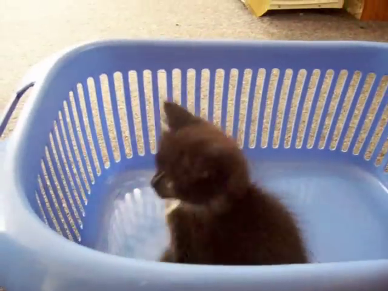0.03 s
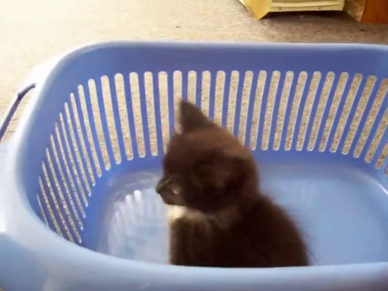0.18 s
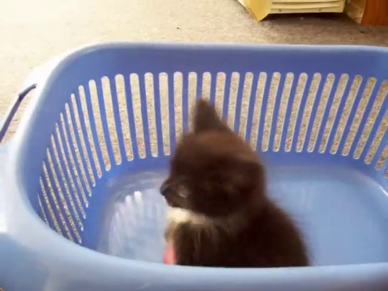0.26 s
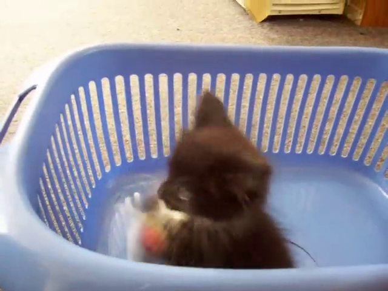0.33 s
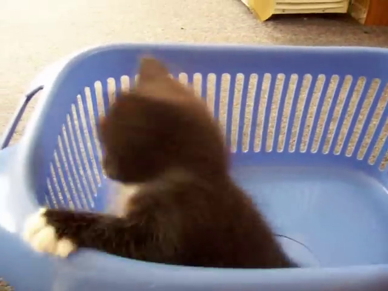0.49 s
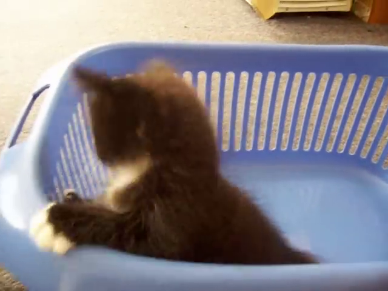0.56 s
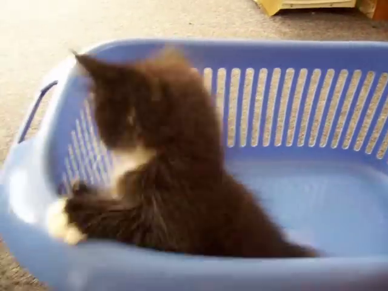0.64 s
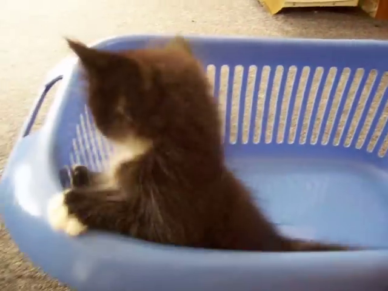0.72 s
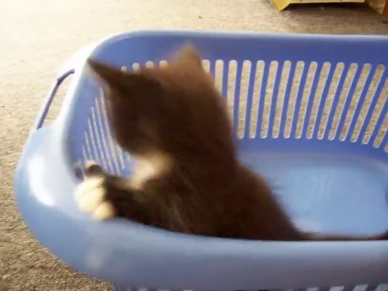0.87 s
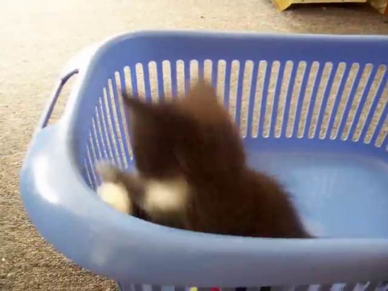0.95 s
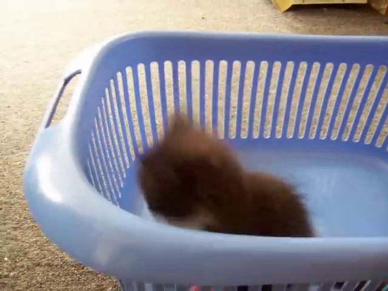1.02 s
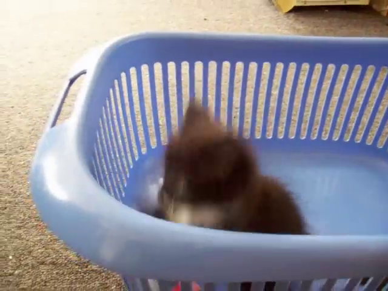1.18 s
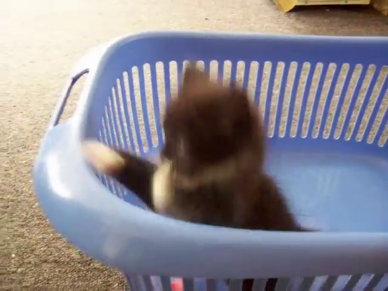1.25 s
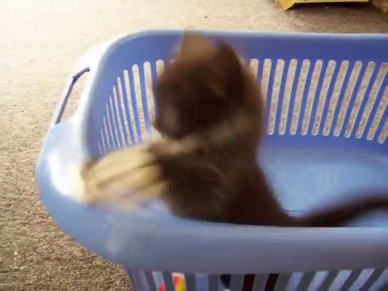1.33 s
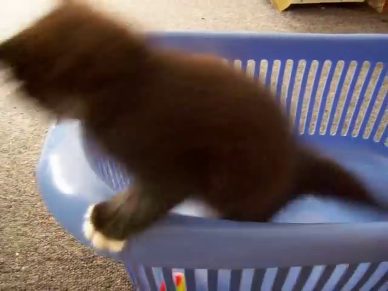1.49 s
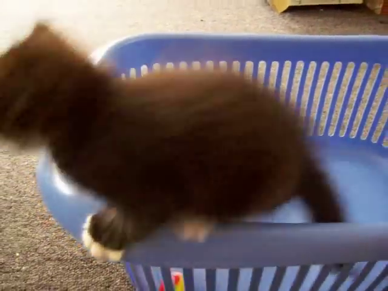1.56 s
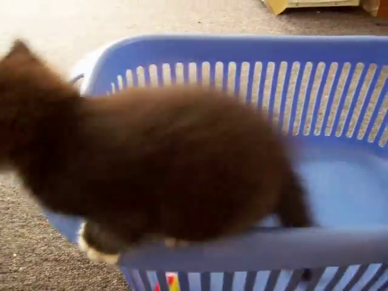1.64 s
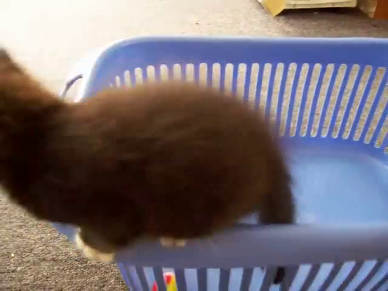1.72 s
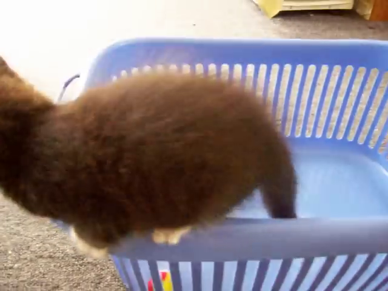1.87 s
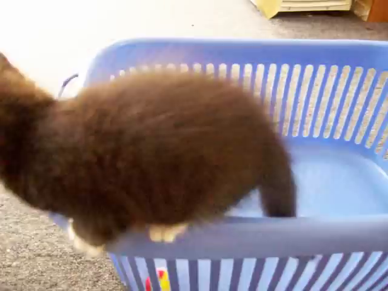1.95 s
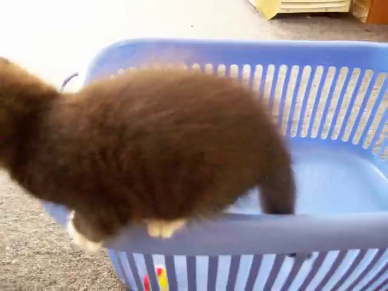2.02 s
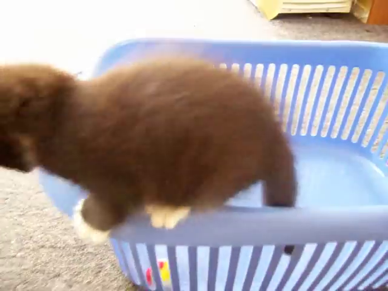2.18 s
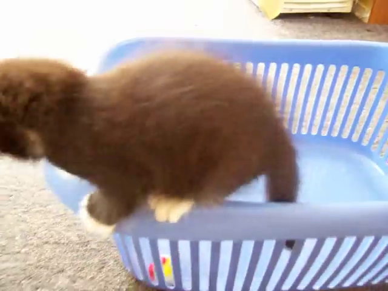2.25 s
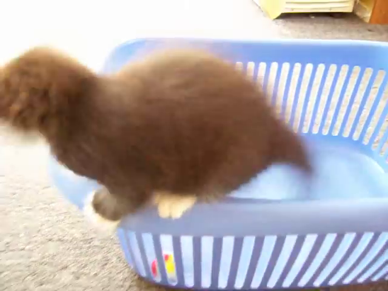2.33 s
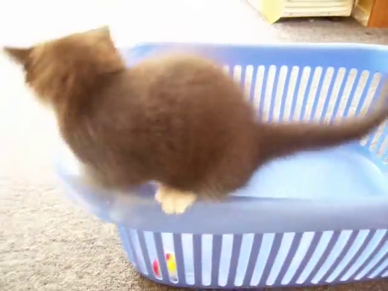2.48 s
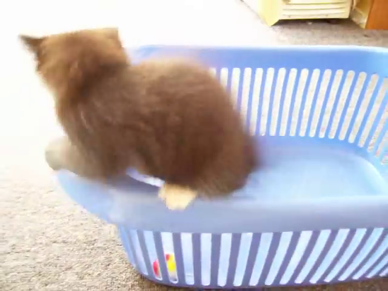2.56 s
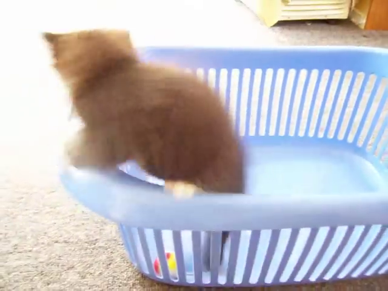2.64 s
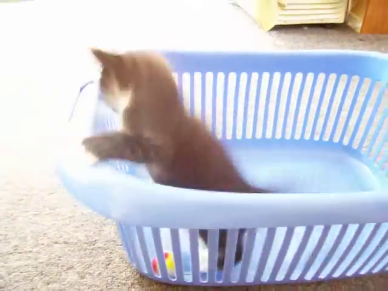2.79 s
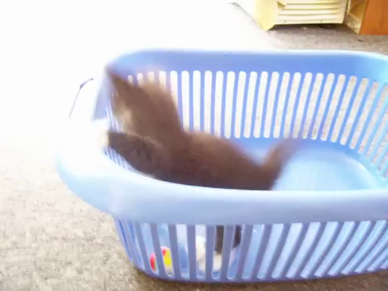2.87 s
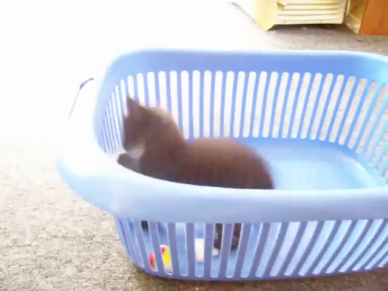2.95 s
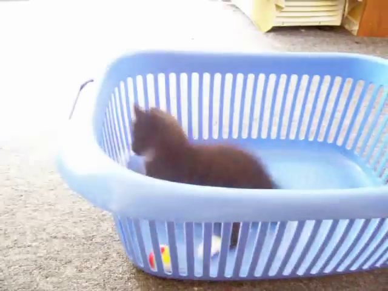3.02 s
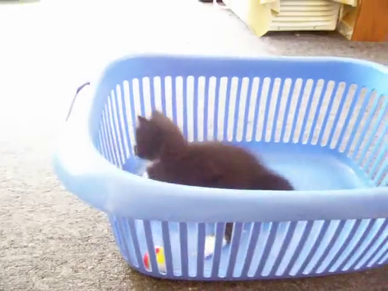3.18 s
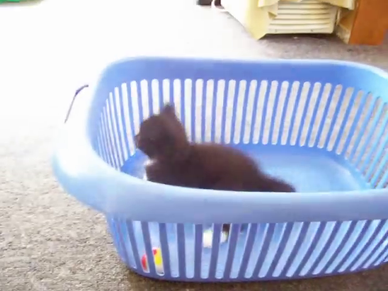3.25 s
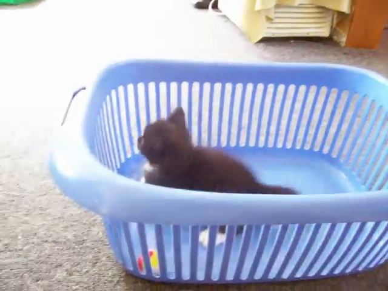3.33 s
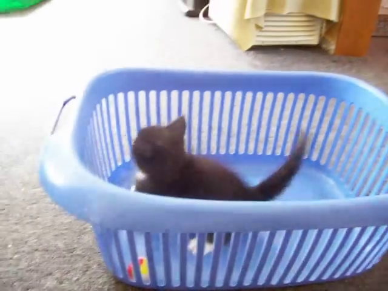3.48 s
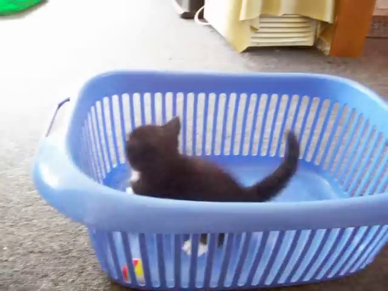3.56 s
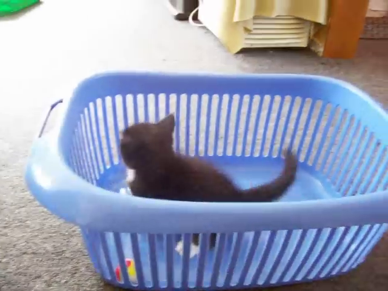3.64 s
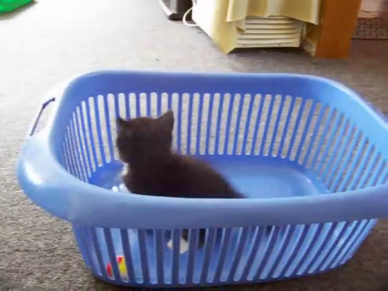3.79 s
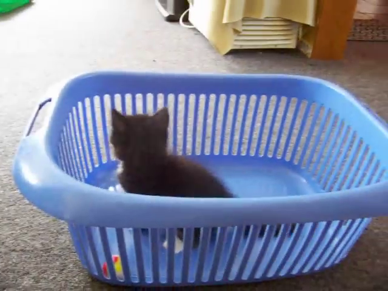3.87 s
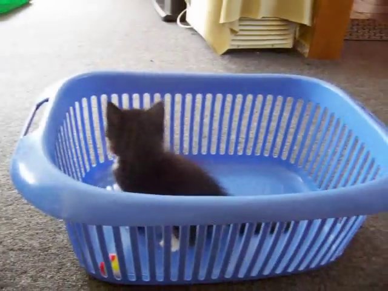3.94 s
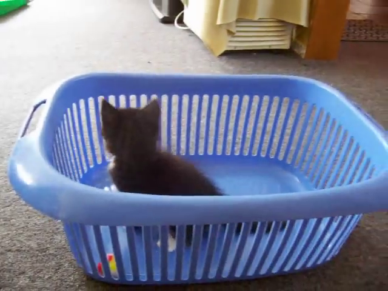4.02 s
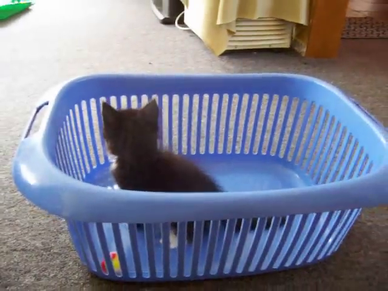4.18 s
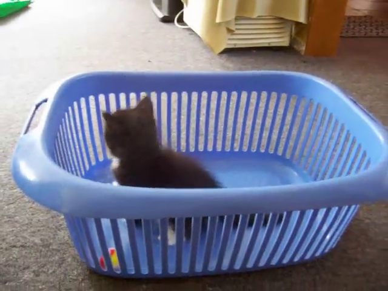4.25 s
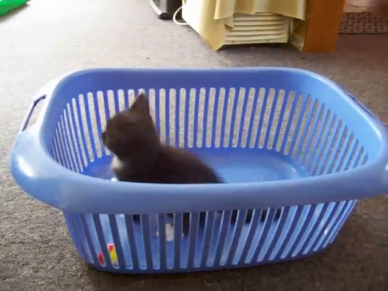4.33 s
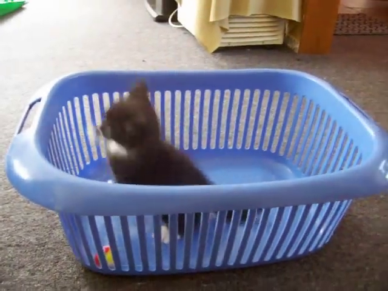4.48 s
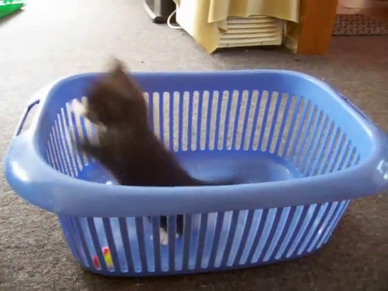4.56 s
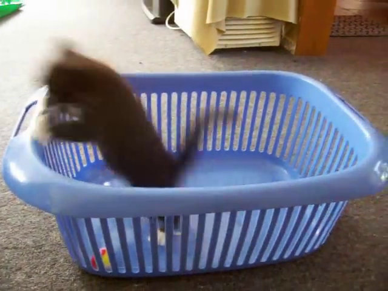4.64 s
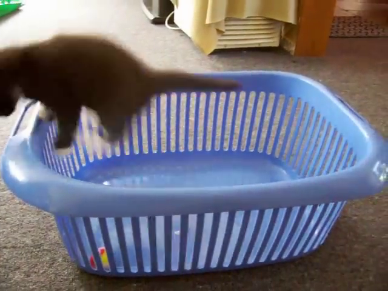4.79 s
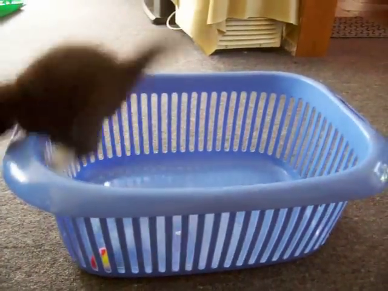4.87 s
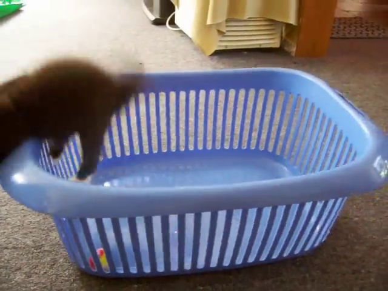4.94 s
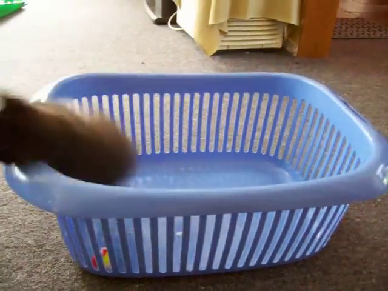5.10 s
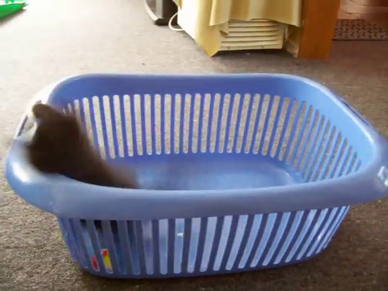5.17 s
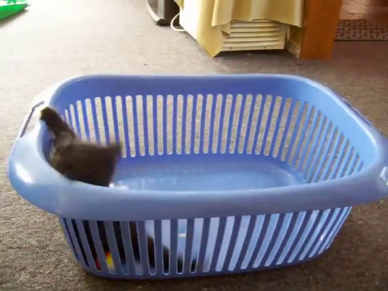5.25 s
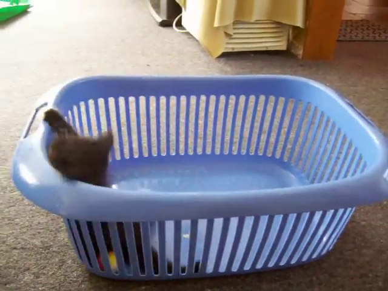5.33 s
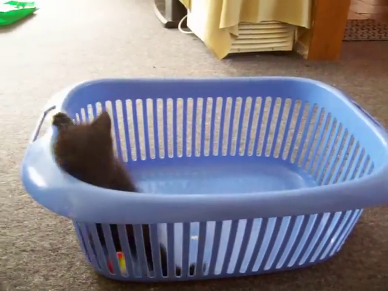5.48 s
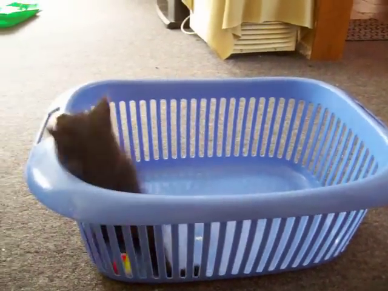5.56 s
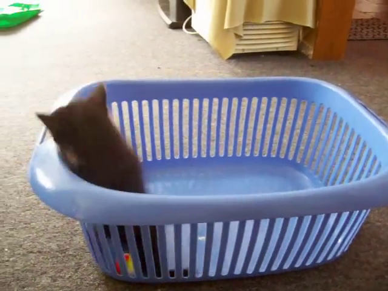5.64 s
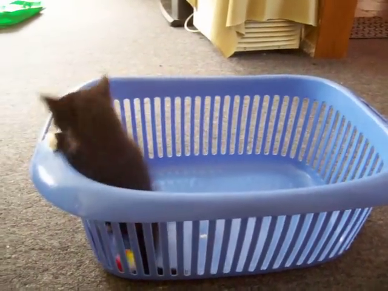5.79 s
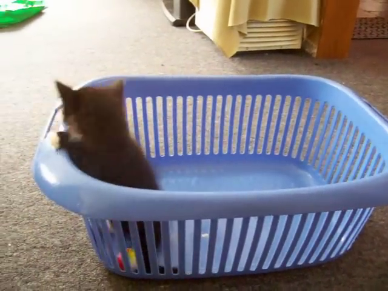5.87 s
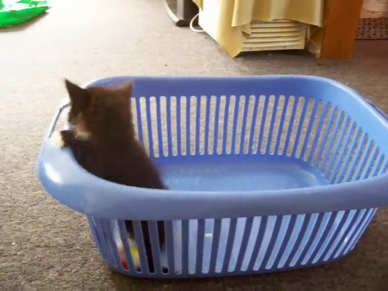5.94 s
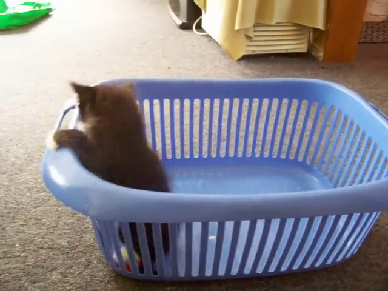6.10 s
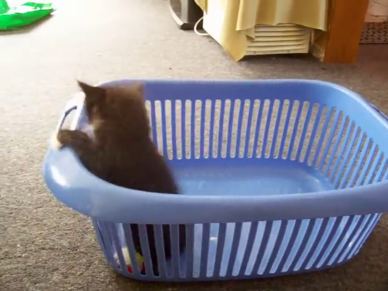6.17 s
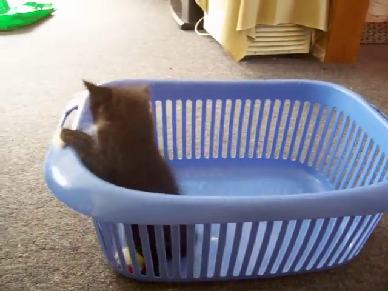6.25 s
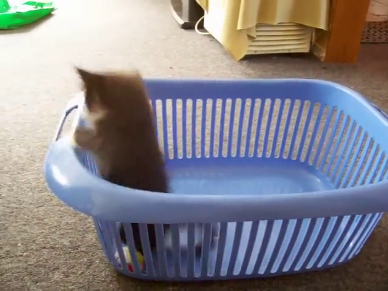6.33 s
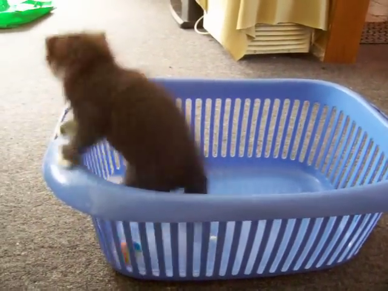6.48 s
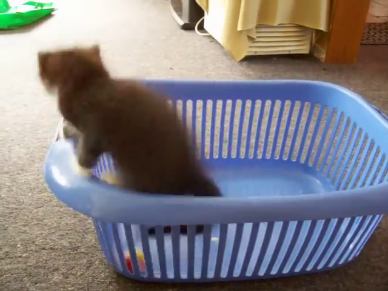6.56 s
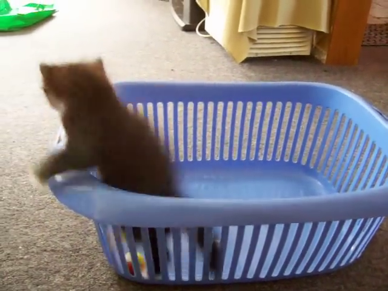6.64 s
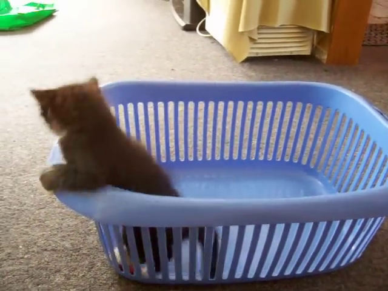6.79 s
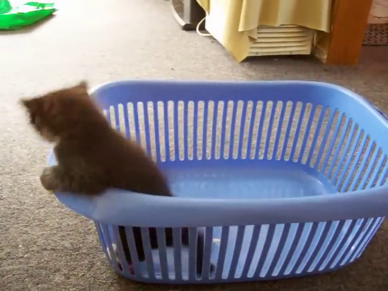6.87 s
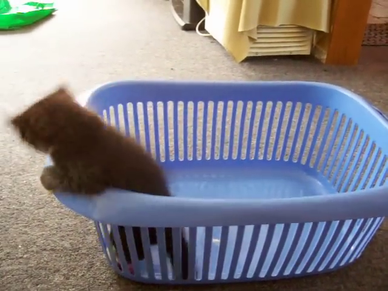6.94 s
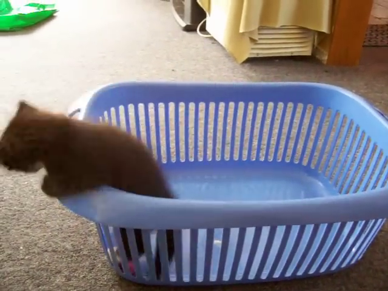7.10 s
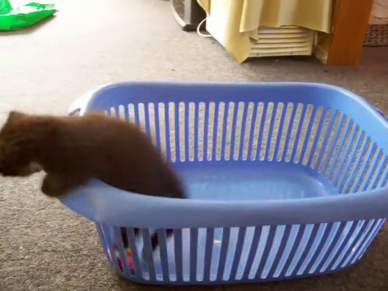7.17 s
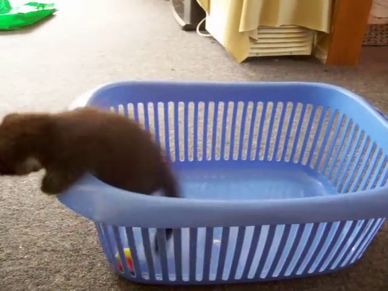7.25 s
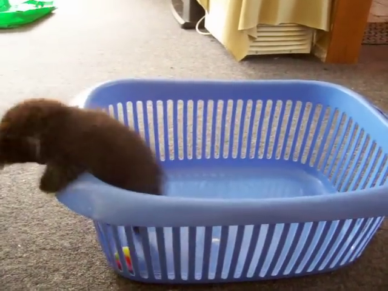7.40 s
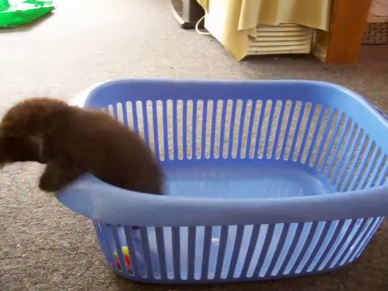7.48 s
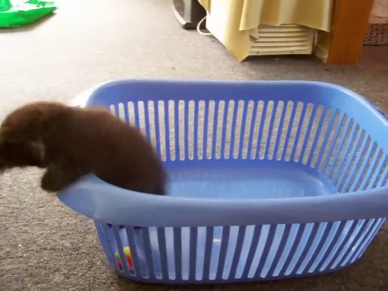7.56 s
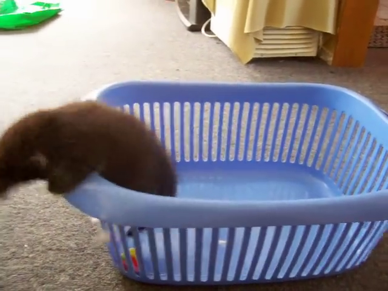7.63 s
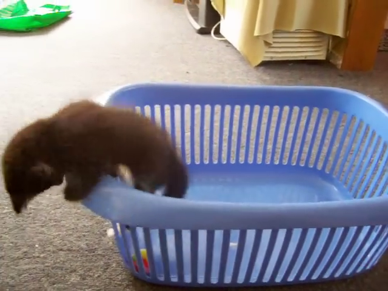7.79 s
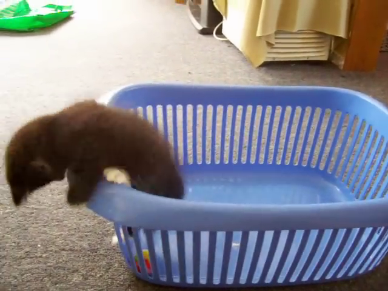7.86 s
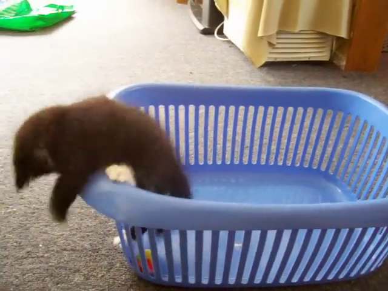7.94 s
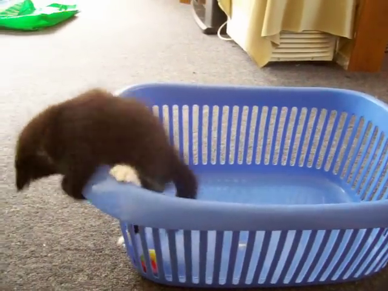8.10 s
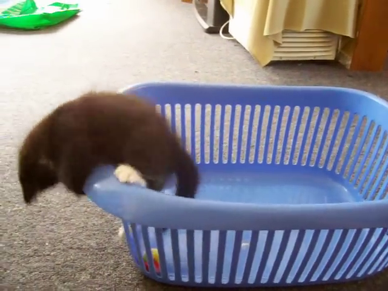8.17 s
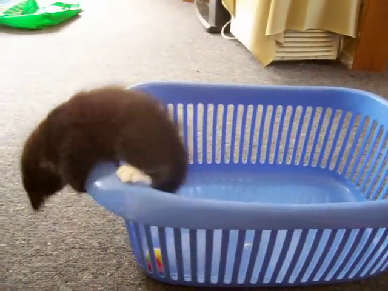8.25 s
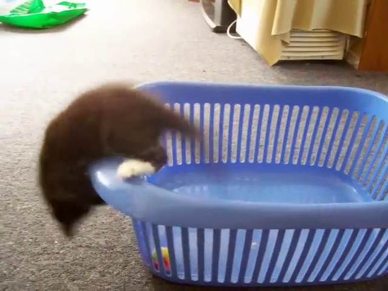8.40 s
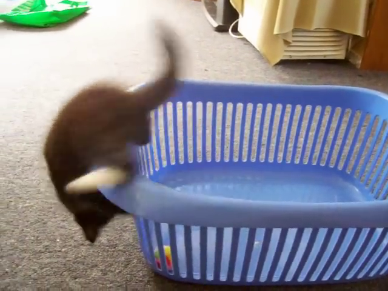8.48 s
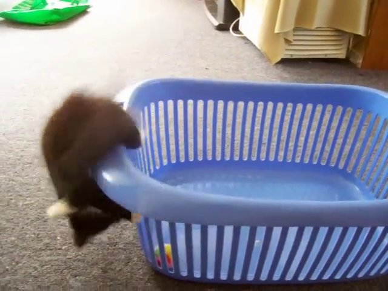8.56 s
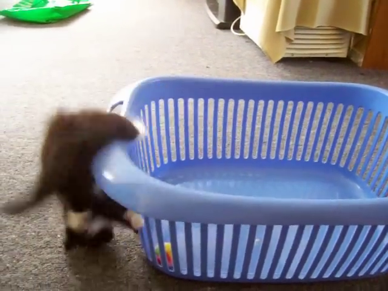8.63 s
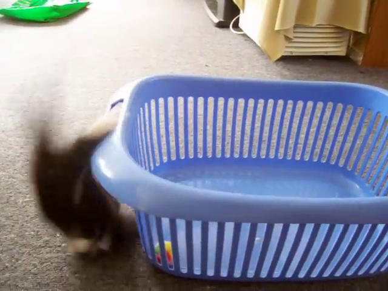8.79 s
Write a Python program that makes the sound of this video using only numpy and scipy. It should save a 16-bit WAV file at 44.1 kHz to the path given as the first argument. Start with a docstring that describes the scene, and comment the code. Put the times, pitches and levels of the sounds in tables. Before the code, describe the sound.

Sharp little claw taps and brief scrapes on hard plastic come in bursts, heard from nearby in a small room. A kitten climbs the side of a laundry basket and twice drops back in with a hollow thump, with a lull between the drops. Scattered ticks and scratching then lead to a last knock near the end. Behind it run a soft airy hum and a faint electronic hiss and whine.

```python
"""Claws tick and scrape on slatted plastic: a kitten scrabbles about in a laundry basket on a carpet.
Each impact excites damped modes: claws ring the slats and rim, paws and body thump the bottom and
sides, and landings shake the floor. Dragged claws rasp by stick-slip friction. A small room
reverberates, and one close snap stays dry. Under it all lie a faint fan-like hum and the hiss and
thin whine of electronics."""
import sys
import numpy as np
from scipy import signal
from scipy.fft import rfft, irfft, next_fast_len
from scipy.io import wavfile
from scipy.ndimage import map_coordinates

SR = 44100
rng = np.random.default_rng(int(sys.argv[2]) if len(sys.argv) > 2 else 0)


def pcm_store(signal):
    """Save signal as 16-bit PCM."""
    levels = np.round(np.clip(np.atleast_2d(signal), -1, 1) * 32767)
    wavfile.write(sys.argv[1], SR, levels.astype(np.int16).T)


N = 388962

# Levels are relative: each source applies its own gain.
# clear claw strikes: (time [s], level [dB], sharpness as tick over slat [dB], slat pitch [Hz])
CLAW_STRIKES = [(.1279, -24, -12.5, 2090), (.411, -33, -10.5, 2650), (.5372, -12, -10, 1850),
                (.6494, -23, -12, 2020), (.6619, -20, -11.5, 2040), (.6744, -34, 3.5, 2200),
                (.7657, -30, -8, 2950), (.7911, -35.5, -1.5, 2050), (.9563, -40, 3.5, 2390),
                (1.0152, -32, -1, 2860), (1.0385, -21.5, -6.5, 2070), (1.1791, -22.5, -4, 2150),
                (1.3722, -28.5, -6.5, 2200), (1.498, -20, 2, 2650), (1.7774, -25, -9.5, 2550),
                (1.9768, -38.5, 1.5, 2450), (2.7072, -23, -2, 2630), (2.786, -23.5, 0.5, 2210),
                (2.8562, -24.5, 2, 2350), (2.9194, -26, -1.5, 2260), (2.953, -38, 13, 2350),
                (2.9642, -35.5, 12, 2380), (2.9953, -27, -0.5, 2520), (3.0911, -16, -7.5, 2320),
                (3.1275, -28, 1, 2430), (3.1429, -23.5, -1.5, 2030), (4.8692, -36.5, -3, 2510),
                (4.9077, -38.5, 7.5, 1970), (4.9303, -23, 2, 2500), (4.9366, -24, 0, 2200),
                (5.0496, -19.5, -11.5, 2230), (5.0978, -19, -6.5, 2400), (5.1103, -24.5, -0.5, 2200),
                (5.1397, -27.5, -4, 2510), (5.1607, -19.5, -6.5, 2520), (5.2325, -33, 6, 2220),
                (5.2824, -32, -8, 2450), (5.3093, -16.5, 0, 2360), (5.3205, -22, -5, 2250),
                (5.3316, -28, -5, 2120), (5.3474, -24, -11.5, 2050), (5.458, -32, -7, 1970),
                (5.6381, -42.5, -1, 2420), (6.1342, -34.5, 0, 2130), (6.1848, -41, -1, 2700),
                (6.4156, -30, 7.5, 2860), (6.553, -19.5, -0.5, 2680), (6.598, -29.5, -5, 2410),
                (6.7079, -25.5, 2, 2490), (6.7595, -23.5, -11, 2130), (6.767, -27, -2.5, 2590),
                (6.9071, -34, -3.5, 2530), (7.0457, -39, 3, 2300), (7.1605, -27.5, -2, 2620),
                (7.2863, -28.5, 0, 2630), (7.4061, -28.5, -1, 2270), (7.6176, -32, -7, 2650),
                (7.7139, -39.5, 4, 2550), (7.7852, -42.5, -1, 2680), (7.8415, -41.5, 0, 1900),
                (8.1533, -36.5, -6, 2440), (8.2731, -28, -1.5, 2430), (8.528, -28, -7, 2340),
                (8.597, -28, -5, 2560), (8.6992, -22, -5.5, 2540), (8.7274, -31.5, 3.5, 2270),
                (8.761, -25, -0.5, 2910), (8.77, -22.5, -5, 2500)]
# padded paw and body blows: (time [s], level [dB], hardness [dB])
PAW_BLOWS = [(.544, -32, 11), (.612, -32.5, -7.5), (.662, -32.5, 5), (.943, -33, -0.5), (1.04, -31.5, 3),
             (1.234, -40, 9), (1.498, -26, 3.5), (2.712, -34.5, 3), (2.809, -27.5, -7.5), (2.92, -30, -4),
             (3.009, -30, 5.5), (3.09, -20, 4), (3.107, -30, -1), (3.143, -34.5, 4), (3.809, -39.5, 1.5),
             (4.505, -43, 2), (4.939, -29.5, 1.5), (4.971, -26.5, -1), (4.983, -22, -3.5),
             (4.995, -26, -0.5), (5.162, -30.5, 6), (5.23, -32, 4), (5.309, -26, 9), (5.3315, -12.5, 1),
             (5.345, -27, 0), (5.365, -25.5, -1), (5.411, -38, -4), (6.66, -39.5, -7), (6.746, -33.5, 5),
             (6.761, -32, 7), (7.084, -39, 3), (8.726, -38.5, 8.5), (8.772, -31.5, 9), (8.809, -22, 1)]
# claws dragged over the plastic: (start [s], length [s], level [dB], brightness [dB])
CLAW_DRAGS = [(0, 0.023, -37.5, 1), (0.733, .04, -41.5, -1), (1.07, .15, -46, 1.5),
              (1.612, 0.027, -43.5, 3.5), (1.75, .05, -33, -6), (2.706, .12, -33.5, -2.5),
              (2.924, .066, -42.5, 5.5), (3.1, .053, -45, 0), (4.942, 0.067, -34, -3.5),
              (5.032, .03, -36.5, -6), (5.104, 0.12, -37, -4), (5.319, .06, -38.5, 0),
              (6.405, .034, -31, 5), (6.589, 0.2, -39, -2), (6.911, .031, -37, -8), (7.042, .07, -37.5, -1),
              (7.33, 0.058, -35, -4.5), (7.406, 0.084, -43, 3.5), (7.517, 0.12, -39.5, -0.5),
              (7.864, .036, -43.5, -5.5), (7.97, .038, -39.5, -7), (8.383, .13, -43.5, 3.5),
              (8.523, .13, -36, -1), (8.629, 0.22, -40.5, -2.5)]
# spells in which the kitten shifts its grip: (start [s], end [s], level [dB])
FIDGET_SPELLS = [(0.129, 0.197, -47.5), (1.2, 1.47, -58.5), (1.601, 1.74, -49), (4.74, 4.92, -56),
                 (6.11, 6.24, -51), (7.641, 7.932, -50.5)]
# the kitten's whole weight reaches the floor: (time [s], level [dB])
LANDING_BLOWS = [(3.086, -31), (5.332, -44)]

# modes of the basket, the floor and the snap: (frequency [Hz], level [dB], nominal t60 [s])
BOTTOM_MODES = [(168, -6, 0.057), (215.3, 1.5, 0.084), (244.3, -1, 0.068)]
SIDE_MODES = [(291, 0.5, 0.087), (336, -7.5, 0.049), (375, 1, 0.08), (449, -1.5, 0.057)]
RIM_MODES = [(541, -2.5, 0.051), (622.5, -2, 0.084), (700, -3.5, 0.053), (813, -1.5, 0.058),
             (849, -3, 0.065), (919, 0, 0.042), (1020, -4.5, 0.059), (1127, -5, 0.054), (1453, -9.5, .03)]
FLOOR_MODES = [(82, 1, .12), (114, -6, 0.083), (143, 5.5, .08)]
SNAP_MODES = [(800, 4, 0.016), (1080, -6, 0.025), (1430, -10, 0.038), (2470, 8, 0.0066), (2780, 0, 0.01),
              (3590, 6, 0.0066), (4050, 1, 0.017), (6000, 7.5, 0.0079), (6600, 7, 0.0083),
              (7800, 2, 0.0081)]

# spectra of the claw noises and the steady noises: (frequency [Hz], level [dB])
SLAT_SPECTRUM = [(900, -30.5), (1400, -12.5), (1750, -3), (2000, 2), (2450, 2), (2900, -1), (3400, -7),
                 (4500, -27.5)]
TICK_SPECTRUM = [(500, -24.5), (2400, -16.5), (3500, 4), (5200, -0.5), (6800, 2.5), (7600, -0.5),
                 (8500, -11.5)]
RASP_SPECTRUM = [(300, -37), (1400, -13.5), (2000, 1), (2450, 6.5), (3000, -3), (3600, -17), (5000, -23.5)]
GRIT_SPECTRUM = [(1500, -24), (3400, -0.5), (4600, 2), (7000, 3.5), (8500, -11)]
AIR_SPECTRUM = [(15, -22.5), (35, -1), (50, 2.5), (95, 5), (115, -0.5), (300, -0.5), (500, 0.5), (900, -3),
                (1200, -10.5), (1700, -21), (4000, -40)]
HISS_SPECTRUM = [(300, -6), (1500, -7.5), (2300, -1.5), (3400, -7), (4900, -7), (5700, 0), (6600, 1.5),
                 (7600, 1.5), (8500, -7.5)]

# narrow bands of the fan-like hum: (frequency [Hz], level [dB], width [Hz])
HUM_BANDS = [(268, -67.5, 5.7), (343.6, -62, 8), (457, -58, 6), (550, -62.5, 9), (622, -64.5, 4.8),
             (687, -60.5, 7), (801, -64, 5), (930, -59.5, 6), (1430, -76.5, 4)]
# tones of the deep drone and the electronic whine: (frequency [Hz], level [dB])
DRONE_TONES = [(49, -58.5), (66, -57), (93, -54)]
WHINE_TONES = [(7865, -52), (8131, -57)]
# reverberation time of the room: (frequency [Hz], t60 [s])
ROOM_DECAY = [(100, 0.26), (300, 0.32), (1000, 0.43), (2400, 0.33), (5000, 0.35), (8000, 0.16)]


def amp(db):
    """Decibels as an amplitude ratio."""
    return 10 ** (np.asarray(db) / 20)


def unit(x):
    """Normalisation to rms 1."""
    return x / np.sqrt(np.mean(x ** 2) + 1e-20)


def unit_onset(x):
    """Normalisation of a blow to rms 1 over its first 10 ms."""
    return x / np.sqrt(np.mean(x[:SR // 100] ** 2) + 1e-20)


def along(points, hz):
    """Interpolation of (frequency [Hz], value) points on a logarithmic frequency axis."""
    frequencies, values = np.transpose(points)
    return np.interp(np.log(hz + 1), np.log(frequencies + 1), values)


def coloured(x, spectrum):
    """Spectral shaping of x, at rms 1."""
    size = next_fast_len(len(x))
    gain = amp(along(spectrum, np.fft.rfftfreq(size, 1 / SR)))
    return unit(irfft(rfft(x, size) * gain, size)[:len(x)])


def wobble(rate):
    """Smooth random modulation, with rate knots a second."""
    knots = rng.standard_normal(int(N * rate / SR) + 4)
    return map_coordinates(knots, [np.arange(N) * rate / SR], order=2)


def add(track, s, sound):
    """Superposition of a sound on the track at time s."""
    start = max(round(s * SR), 0)
    track[start:start + len(sound)] += sound[:max(N - start, 0)]


def ring(modes, t, damping, attack_s, scatter):
    """Free vibration: damped modes, whose strengths and pitches vary from blow to blow."""
    hz, db, t60 = np.transpose(modes)[:, :, None]
    strength, detune, phase = rng.standard_normal((3, len(modes), 1))
    waves = np.sin(2 * np.pi * (hz * np.exp(scatter * detune) * t + phase))
    decays = amp(db + 2 * strength - 60 * t * damping / t60)
    return unit_onset((1 - np.exp(-t / attack_s)) * np.sum(decays * waves, axis=0))


def burst(spectrum, hz, t, t60, width_hz, attack_s, broadband):
    """Modal overlap: close, heavily damped modes merge into decaying noise with a resonance at hz."""
    noise = coloured(rng.standard_normal(len(t)), spectrum)
    resonance = signal.lfilter(*signal.iirpeak(hz, hz / width_hz, SR), noise)
    envelope = (1 - np.exp(-t / attack_s)) * amp(-60 * t / t60)
    return unit_onset((resonance + broadband * noise) * envelope)


def dispersed(x, travel_s, at_hz=2500):
    """Dispersion: bending wave speed grows as the root of frequency, so treble leads and bass lags."""
    size = next_fast_len(N + SR // 2)
    hz = np.fft.rfftfreq(size, 1 / SR)
    lag_cycles = travel_s * (2 * np.sqrt(at_hz * hz) - hz)  # no group delay at at_hz
    return irfft(rfft(x, size) * np.exp(-2j * np.pi * lag_cycles), size)[:N]


def air_and_hum():
    """Broadband noise of moving air, with a drone and hum lines broadened by random modulation."""
    t = np.arange(N) / SR
    air = amp(-45.5) * coloured(rng.standard_normal(N), AIR_SPECTRUM)
    drone, hum = np.zeros((2, N))
    for hz, db in DRONE_TONES:
        drone += amp(db + 1.5 * wobble(5)) * unit(np.sin(2 * np.pi * hz * t + 1.1 * wobble(9.8)))
    for hz, db, width_hz in HUM_BANDS:
        envelope = wobble(2 * width_hz) + 1j * wobble(2 * width_hz)
        hum += amp(db + 2) * unit(np.real(envelope * np.exp(2j * np.pi * hz * t)))
    return air + drone + hum


def electronics(skips_per_s=30, skip_cycles=-.43):
    """Electronic hiss and two high tones; phase modulation in regular skips makes the tones buzz."""
    t = np.arange(N) / SR
    phase = skip_cycles * np.floor(skips_per_s * t)
    whine = sum(amp(db - 1.94) * unit(np.sin(2 * np.pi * (hz * t + phase))) for hz, db in WHINE_TONES)
    hiss = amp(-48.5) * coloured(rng.standard_normal(N), HISS_SPECTRUM)
    return hiss + whine


def room(x, delay_s=.005):
    """Reverberation: wall reflections form a diffuse tail in which each frequency dies at its own rate."""
    out, block = np.zeros(N), SR // 4
    for start in range(0, N, block):
        hz, t, noise = signal.stft(rng.standard_normal(SR // 2), SR, nperseg=256)
        decay = amp(-60 * t / along(ROOM_DECAY, hz)[:, None])
        tail = signal.istft(noise * decay, SR, nperseg=256)[1]
        tail /= np.linalg.norm(tail)
        add(out, start / SR + delay_s, signal.fftconvolve(x[start:start + block], tail))
    return out


def snap(at_s=.3335):
    """Direct sound alone: a hard little click, too close for the room to answer."""
    out, t = np.zeros(N), np.arange(SR // 16) / SR
    add(out, at_s, amp(-22) * ring(SNAP_MODES, t, damping=.85, attack_s=.000206, scatter=.0092))
    return out


def landings():
    """Structure-borne sound: a jump into the basket excites the floor under the carpet."""
    out, t = np.zeros(N), np.arange(SR // 4) / SR
    for s, db in LANDING_BLOWS:
        add(out, s, amp(db) * ring(FLOOR_MODES, t, damping=.99, attack_s=.0019, scatter=.02))
    return out


def paws(radiates_above_hz=122):
    """Padded impacts ring the basket's bottom, sides and rim, but not the bright slat resonances; hardness
    shifts energy from bottom to rim."""
    out, t = np.zeros(N), np.arange(SR // 4) / SR
    for s, db, hard_db in PAW_BLOWS:
        choke = 1.3 * np.exp(-.05 * hard_db)  # a soft paw stays on the bottom and damps its boom
        wall_loss_db = .6 * max(hard_db, 0)  # a blow high on the wall barely moves the bottom
        bottom = ring(BOTTOM_MODES, t, damping=choke, attack_s=.0015, scatter=.02)
        sides = ring(SIDE_MODES, t, damping=.78 * choke, attack_s=.0011, scatter=.011)
        rim = ring(RIM_MODES, t, damping=1.2, attack_s=.0006, scatter=.018)
        add(out, s, amp(db - hard_db - wall_loss_db - 3.3) * bottom)
        add(out, s, amp(db - 3.1) * sides)
        add(out, s, amp(db + hard_db - 6) * rim)
    # the open basket radiates little deep bass
    return signal.sosfilt(signal.butter(2, radiates_above_hz, "high", fs=SR, output="sos"), out)


def brushing_force(swing_db=3):
    """Contact force: the light, uneven pressure of the claws on the wall while the kitten fidgets."""
    force = np.zeros(N)
    for start, end, db in FIDGET_SPELLS:
        add(force, start, amp(db - 2.5) * signal.windows.tukey(int((end - start) * SR), .3))
    return force * amp(swing_db * wobble(rate=28))


def scrapes(slips_per_s=1000, spread_db=2.5, catch_db=3.5):
    """Stick-slip friction: a dragged claw rattles the slats in tiny jerks; a sharp tip adds grit."""
    slat_force = brushing_force()
    tip_force = slat_force.copy()
    slipping = rng.random(N) < slips_per_s / SR
    slips = slipping * amp(spread_db * rng.standard_normal(N)) * rng.choice([-1, 1], N)
    slips *= amp(catch_db * wobble(rate=110))  # the claw catches and lets go
    for s, length, db, bright_db in CLAW_DRAGS:
        stroke = amp(db) * signal.windows.tukey(int(length * SR), .7)
        add(slat_force, s, stroke)
        add(tip_force, s, amp(bright_db) * stroke)
    return slat_force * coloured(slips, RASP_SPECTRUM) + tip_force * coloured(slips, GRIT_SPECTRUM)


def light_touches(per_s=14, spread_db=2.6, slat_hz=2450, spread_hz=250):
    """Weak impacts at jittered times in each spell of fidgeting, as rows like those of CLAW_STRIKES."""
    rows = []
    for start, end, db in FIDGET_SPELLS:
        for k, (jitter, force, edge, slat) in enumerate(rng.standard_normal((16, 4))):
            s = start + (k + .5 + jitter / 4) / per_s
            if s < end:
                rows.append((s, db + 4 + spread_db * force, spread_db * edge, slat_hz + spread_hz * slat))
    return rows


def claws(middling_t60_s=.021, middling_db=-24):
    """Impulsive excitation: a hard claw ticks on the plastic and sets a slat and the rim ringing."""
    out, t = np.zeros(N), np.arange(SR // 8) / SR
    for s, db, sharp_db, slat_hz in list(CLAW_STRIKES) + light_touches():
        t60 = middling_t60_s * np.exp(-.0728 * (db - middling_db))  # a harder strike is over sooner
        tick_hz = np.clip(5270 + 150.5 * sharp_db, 3300, 7200)  # a sharper claw ticks higher
        tick = burst(TICK_SPECTRUM, tick_hz, t, t60, width_hz=1600, attack_s=.0013, broadband=1)
        slat = burst(SLAT_SPECTRUM, slat_hz, t, t60 + .0073, width_hz=790, attack_s=.0022, broadband=.24)
        rim = ring(RIM_MODES, t, damping=.71, attack_s=.001, scatter=.054)
        add(out, s, amp(db + sharp_db - 4.5) * tick)
        add(out, s, amp(db - 4) * slat)
        add(out, s, amp(db - 18) * rim)
    return dispersed(out, travel_s=.002802)


def scene():
    """Superposition of direct sound, the room's reverberation and the background, in one channel."""
    taps, thumps, rasp = claws(), paws(), scrapes()
    reverberation = room(amp(-10) * taps + amp(-6) * thumps + amp(-9) * rasp)
    direct = taps + thumps + amp(-3) * rasp + landings() + snap()
    return (direct + reverberation + air_and_hum() + electronics())[None]


def record(dry):
    """Band limiting: a steep low-pass filter removes the highest treble."""
    corner_hz, stop_hz = 8350, 9150
    size = next_fast_len(N + SR // 2)
    hz = np.fft.rfftfreq(size, 1 / SR)
    gain = (hz < stop_hz) / np.sqrt(1 + (hz / corner_hz) ** 80)
    return irfft(rfft(dry, size) * gain, size)[..., :N]


dry = scene()
out = record(dry)
pcm_store(out)
```